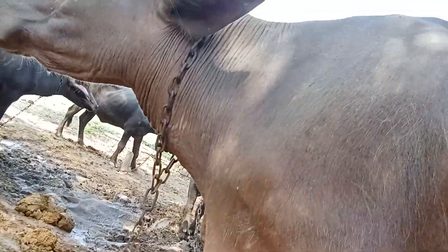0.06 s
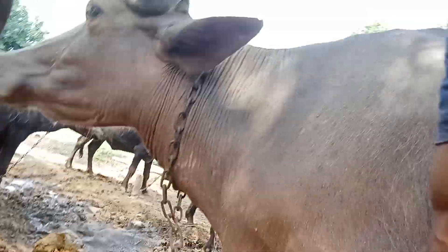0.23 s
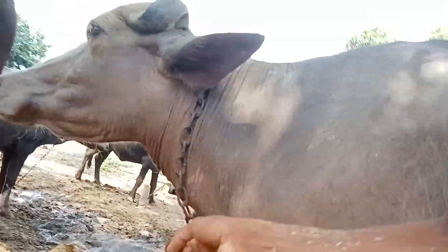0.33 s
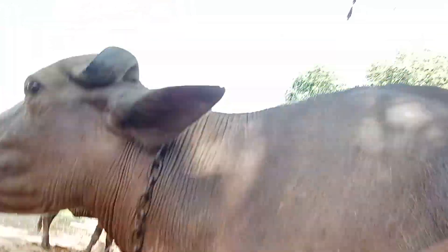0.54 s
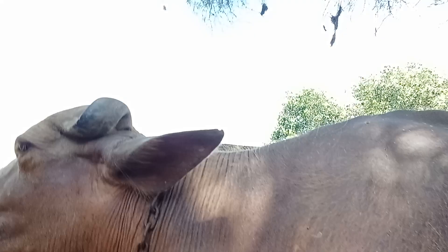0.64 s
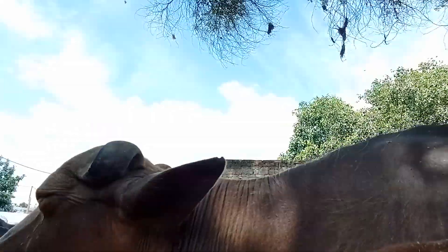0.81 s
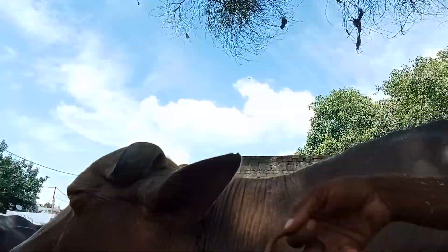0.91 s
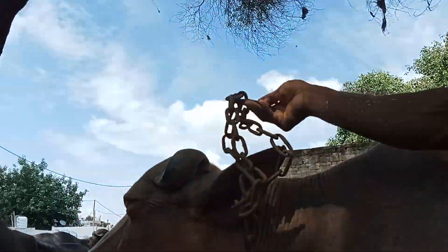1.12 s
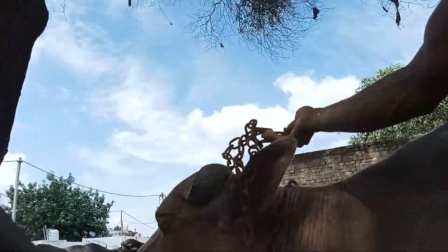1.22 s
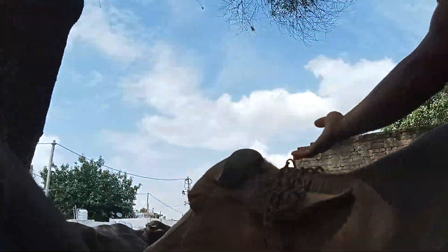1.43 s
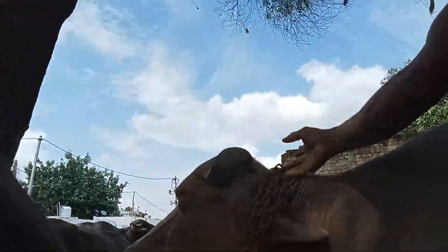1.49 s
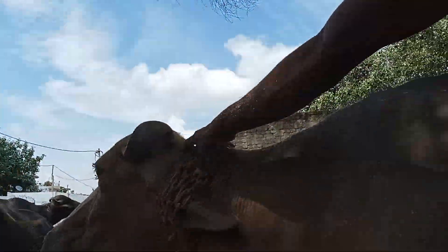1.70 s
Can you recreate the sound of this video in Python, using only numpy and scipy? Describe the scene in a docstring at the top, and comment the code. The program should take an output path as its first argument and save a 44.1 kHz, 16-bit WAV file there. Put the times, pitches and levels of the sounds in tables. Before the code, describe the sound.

A heavy iron chain clinks and rattles close to a small microphone, first with a hard clank and muted links, then brighter jingling as it drops in a bunch; soft hide rubs, faint far engine, open yard.

```python
"""Tether chain lifted off a buffalo

An iron chain comes off the animal's neck, close by in an open yard: ringing modes and gritty noise ticks
make the clinks, dull on the hide, then high and jingling, with bunched contacts for the rattles.
Noise grains make the grinding, noise cracks and low modes the hard knocks.
Shaped noise and short tones rub and bump on the hide; wavering tones over air noise make a far engine.
"""
import sys
import numpy as np
from scipy import signal
from scipy.fft import rfft, irfft
from scipy.io import wavfile

SR = 44100
rng = np.random.default_rng(int(sys.argv[2]) if len(sys.argv) > 2 else 0)


def transcribe(signal):
    """Save signal, clipped to [-1, 1], as a 16-bit WAV file at the path in sys.argv[1]."""
    frames = np.atleast_2d(signal).T
    limited = np.clip(frames, -1, 1)
    pcm = np.round(limited * 32767).astype(np.int16)
    wavfile.write(sys.argv[1], SR, pcm)


N = 77175
T = np.arange(N) / SR
HIT_T = T[:SR * 2 // 5]  # time within one hit, s

# link strikes: start_s, ring_db, tick_db (before TICK_LIFT_DB), ring_length (share of free ring), link (number)
CLINKS = [(0.0005, -43, -32, 2.1, 0), (0.071, -22.5, -33.5, 0.44, 0), (0.112, -23, -45, 0.3, 0),
          (0.123, -26.5, -28.5, 0.7, 0), (0.1621, -25.5, -35, 0.28, 0), (0.1779, -25, -33.5, 0.53, 0),
          (0.203, -12, -32.5, 0.36, 0), (0.232, -13.5, -35.5, 0.23, 2), (0.3871, -16.5, -31, 1.13, 1),
          (0.398, -21, -39, 1, 1), (0.517, -37, -59, 0.95, 2), (0.576, -38, -43, 0.15, 2),
          (0.579, -30.5, -38.5, 1.3, 1), (0.5944, -24, -35.5, 0.37, 2), (0.608, -18.5, -35, 0.53, 1),
          (0.638, -48, -43, 0.5, 2), (0.658, -23.5, -38, 1.05, 2), (0.666, -24, -35.5, 0.7, 2),
          (0.704, -38, -42.5, 0.37, 1), (0.7219, -27.5, -38, 0.69, 2), (0.751, -47, -39.5, 0.64, 2),
          (0.768, -54, -42.5, 0.4, 2), (0.8044, -19, -36.5, 0.63, 1), (0.813, -26, -35.5, 0.54, 2),
          (0.819, -20, -35, 0.75, 1), (0.835, -36, -37, 0.56, 2), (0.8632, -47, -35, 0.46, 2),
          (0.869, -25, -47, 0.27, 1), (0.874, -54, -34, 0.47, 2), (0.968, -17, -34.5, 0.57, 3),
          (0.9898, -23, -38, 0.37, 3), (1.0117, -16.5, -44, 0.67, 4), (1.097, -44, -55, 0.26, 11),
          (1.127, -16, -49.5, 0.97, 5), (1.1637, -35, -50, 0.48, 11), (1.201, -31.5, -44, 0.32, 11),
          (1.2128, -18, -27, 2.2, 6), (1.252, -17, -49, 0.2, 2), (1.258, -16, -29.5, 1.36, 7),
          (1.271, -19, -58, 0.52, 7), (1.2811, -15, -34, 0.24, 2), (1.295, -29.5, -29, 0.99, 3),
          (1.3208, -32.5, -43, 1.1, 7), (1.349, -41, -37.5, 1.2, 3), (1.365, -24, -37, 1.3, 8),
          (1.386, -30, -40, 1.28, 8), (1.396, -20.5, -55, 0.55, 7), (1.4177, -35.5, -34.5, 3.8, 2),
          (1.439, -30, -40, 0.34, 2), (1.4631, -11, -34.5, 0.74, 9), (1.469, -17, -37.5, 0.31, 6),
          (1.506, -40, -43, 0.84, 6), (1.5396, -30.5, -37, 0.62, 10), (1.5734, -34.5, -36, 0.87, 10),
          (1.59, -38, -45.5, 0.27, 10), (1.642, -43, -47.5, 0.54, 10), (1.694, -67, -51, 0.37, 6)]
# modes of each link or bunch, by number: pitch_hz, level_db (relative), t60_s (of the free ring)
LINK_MODES = { 0: [(3080, -11, .13), (3330, -10, .07), (7950, -4, .04), (9100, 0, .035), (10050, -5, .07),
              (12620, -8, .06), (15000, -8, .07)], 1: [(9388, -1, .2), (9453, 0, .16), (9510, -2, .12),
              (10800, -8, .11), (11080, -9, .14), (11255, -7, .17), (11540, -11, .08), (11800, -9, .13)],
              2: [(9540, 3, 0.11), (9880, 0, 0.11), (10000, -16, 0.079), (10920, 2.5, 0.12),
              (11600, 6, .07), (11760, -2, 0.083), (11280, -2, 0.1), (12000, -0.5, 0.18),
              (12600, 3, 0.059)], 3: [(9776, 0, .09), (10130, -4, .07), (10900, -9, .04), (11500, -3, .07),
              (12300, -12, .07)], 4: [(9663, 0, .07), (10950, -13, .17), (11000, -4, .055)],
              5: [(6800, -22, .03), (8590, -19, .04), (11250, 0, .07), (11390, -6, .1)],
              6: [(9442, -16, .12), (12293, -2, .13), (12340, -4, .1), (12957, -5, .12), (13350, -9, .06),
              (14050, -5, .12), (14720, -5, .03)], 7: [(9480, -15, .08), (12957, -11, .13), (13120, 0, .16),
              (13207, -8, .12), (13530, -2, .13), (13750, -12, .06), (14050, -13, .12)],
              8: [(2890, -14, .1), (3150, -13, .17), (3290, -12, .15), (7820, -12, .11), (8700, -9, .08),
              (9700, -9, .05), (12310, -5, .1), (13070, -4, .1), (13560, 0, .14)], 9: [(8420, -21, .07),
              (8790, -20, .08), (12330, -14, .09), (13570, 0, .085), (14920, -12, .06)],
              10: [(2900, -7, .16), (3310, -7, .16), (7860, -10, .11), (8990, 0, .19), (9380, -7, .11),
              (12330, -10, .12), (14850, -7, .2)], 11: [(6750, -1, .06), (8600, 0, .07), (11300, -3, .06)],
              }
# colour of the contact tick and its grind: freq_hz, level_db (per Hz, relative)
TICK_COLOUR = [(500, -11.5), (1500, -10), (2500, -4.5), (4200, 5), (6000, -3.5), (8000, -2.5), (10000, 2),
               (12500, -1.5), (14000, -2), (15500, -1)]
# bunches of links tumbling over one another: start_s, length_s, level_db (before RATTLE_TRIM_DB), centre_hz
RATTLES = [(0.592, 0.026, -27.5, 11600), (0.656, 0.054, -28.5, 11200), (0.804, 0.032, -30.5, 11200),
           (0.861, 0.022, -53, 10800), (1.2114, 0.005, -24, 14200), (1.241, 0.032, -22, 12900),
           (1.341, 0.025, -28, 10300), (1.381, 0.022, -25, 13500), (1.4, 0.055, -36, 10200)]
# course of the links' shifting between strikes: time_s, level_db (before SHIFT_TRIM_DB)
SHIFT_LEVELS = [(0.0, -45.5), (0.326, -55), (1.242, -57.5), (1.378, -48), (1.75, -55.5)]
# colour of the shifting links: freq_hz, level_db (per Hz, relative)
SHIFT_COLOUR = [(500, 9), (1500, 4.5), (2500, 2.5), (4000, 4.5), (6000, -40.5), (8000, -53), (10000, 1),
                (12500, -5.5), (15000, -16)]
# hard knocks: start_s, body_db, crack_db, crack_hz (centre), body (number)
KNOCKS = [(0.2306, -15, -17, 3720, 0), (0.2333, -20, -29, 3500, 0), (0.264, -46, -42, 1480, 0),
          (0.292, -37, -35, 1620, 0), (.3125, -49, -34, 1490, 0), (.453, -49, -45, 960, 0),
          (.869, -54, -36.5, 1690, 1), (1.012, -46, -48, 1370, 1), (1.2928, -24, -33, 4150, 1),
          (1.3007, -21.5, -26.5, 2220, 1), (1.3005, -28, -31, 3970, 1), (1.4173, -56, -36.5, 1064, 1)]
# modes of a hollow clank (0) and of a duller thud (1): pitch_hz, level_db (relative), t60_s
BODY_MODES = { 0: [(346, -10.5, 0.041), (450, -12.5, 0.048), (557, -14, 0.03), (830, -9, 0.029),
              (899, -6, 0.15), (954, -12.5, 0.09), (1253, -2, 0.024), (1580, -2.5, 0.027),
              (2140, -1, 0.023), (2690, -1.5, 0.022), (3470, 2.5, 0.013), (4080, -6, 0.03)],
              1: [(290, -9, .053), (430, -2, .045), (530, -3, .04), (720, -4, .03), (1050, -1, .03),
              (1400, -3, .025), (1780, -6, .025), (2350, -2, .018), (3100, -6, .02)], }
# rubs on the hide: start_s, length_s, level_db (before the swelling)
RUBS = [(-.02, 0.064, -44.5), (0.103, 0.16, -45.5), (0.229, 0.11, -43), (0.44, 0.053, -58.5),
        (0.833, 0.131, -50), (1.227, 0.13, -51), (1.391, 0.064, -62)]
# colour of the rubs: freq_hz, level_db (per Hz, relative)
RUB_COLOUR = [(100, -23), (250, -2.5), (450, 3.5), (650, -3), (800, 1.5), (920, 0), (1100, -10),
              (1600, -5.5), (2200, -14), (4000, -16.5), (8000, -36)]
# soft bumps on the animal: start_s, length_s, pitch_hz, level_db (peak)
BUMPS = [(-.01, 0.027, 104, -33), (.12, 0.026, 122, -38.5), (0.902, 0.032, 228, -37.5),
         (1.262, 0.02, 400, -39.5), (1.526, 0.059, 69.3, -41.5)]
# partials of the engine: multiple (of ENGINE_HZ), level_db
ENGINE_PARTIALS = [(2, -61), (3, -59), (4, -59), (5, -57)]
# faint far tones that come and go: start_s, length_s, pitch_hz, level_db (at the top of the swell)
WHINES = [(0.446, 0.51, 706.5, -59.5), (0.847, 0.24, 842, -58), (1.397, 0.33, 845, -62)]
# colour of the outdoor air: freq_hz, level_db (per Hz, relative)
YARD_COLOUR = [(25, -6), (70, 10.5), (105, 14), (190, 2), (326, 0), (700, -21), (950, -8), (2000, -33),
               (4030, -14), (6900, -30.5), (9570, -14), (12200, -26), (16000, -50)]

# pitch spread from strike to strike (share), wider for the numbers that are bunches of unlike links
DETUNE, BUNCH_DETUNE, BUNCHES = .001, .014, (0, 2)
ATTACK_S, MODE_SPREAD_DB = 0.00014, 3
RING_WANDER_RAD, RING_WANDER_S = 0.51, 0.00646  # a tumbling link's phase: typical step, time per step
TICK_LIFT_DB, TICK_T60_S = 7, 0.018
GRIND_DB, GRIND_T60_S = -10.5, 0.097  # level relative to the tick
# links bounce and slide just after they meet: energy against the first blow, decay at ring length 1
CHATTER_DB, CHATTER_T60_S = 1.5, 0.026
RATTLE_TRIM_DB, RATTLE_T60_S, RATTLE_OCTAVES = -1.8, 0.03354, 0.11
RATTLE_TICK_DB, RATTLE_TICK_T60_S = -6.5, 0.013  # level relative to the ring
SHIFT_TRIM_DB, SHIFTS_PER_S, SHIFT_SPREAD_DB, SHIFT_T60_S = -2.5, 1300, -0.5, 0.056
CRACK_T60_S, CRACK_OCTAVES = 0.031, 0.13
BODY_RISE_S, BODY_SPREAD_DB = 0.00026, 1.5
RUB_SWELL_DB, RUB_SWELL_HZ = 3.04, 121
ENGINE_HZ, ENGINE_WAVER_RAD, WHINE_WAVER_RAD = 41.2, 0.3, 0.8
YARD_DB = -53
ECHO_DB, ECHO_T60_S, ECHO_GAP_S = -20.5, 0.3, .004
LOW_CUT_HZ, EDGE_HZ = 49, 15650


def amp(db):
    """Turns decibels into gain."""
    return 10 ** (np.asarray(db) / 20)


def unit(x):
    """Scales a sound to rms 1."""
    return x / np.sqrt(np.mean(x ** 2) + 1e-20)


def fade(t60):
    """Exponential decay over one hit, down 60 dB after t60 seconds."""
    return np.exp(-np.log(1000) * HIT_T / max(t60, 1e-3))


def add(mix, s, sound):
    """Mixes a sound in at time s, trimming whatever falls outside."""
    start = round(s * SR)
    sound = sound[max(-start, 0):]
    part = mix[max(start, 0):][:len(sound)]
    part += sound[:len(part)]


def colour(x, points):
    """Filters a sound through a smooth spectral curve and sets it to rms 1."""
    hz, db = np.transpose(points)
    f = np.fft.rfftfreq(len(x), 1 / SR)
    gain = amp(np.interp(np.log(f + 1), np.log(hz), db))
    return unit(irfft(rfft(x) * gain, len(x)))


def noise(points, size):
    """Coloured noise of rms 1."""
    return colour(rng.standard_normal(size), points)


def drift(hz):
    """Slow random motion of rms 1: noise with a soft upper limit near hz."""
    lowpass = np.exp(-(np.fft.rfftfreq(N, 1 / SR) / hz) ** 2)
    return unit(irfft(rfft(rng.standard_normal(N)) * lowpass, N))


def ring(modes, length, detune, spread_db):
    """Struck metal: dying modes that wander in phase, each blow weighting them a little differently."""
    hz, db, t60 = np.transpose(modes)
    weight = amp(db + spread_db * rng.standard_normal(len(hz)))
    hz = hz * (1 + detune * rng.standard_normal(len(hz)))
    wander = RING_WANDER_RAD * rng.standard_normal((len(hz), 64)).cumsum(axis=1)
    knots = np.arange(wander.shape[1]) * RING_WANDER_S
    waves = np.zeros(len(HIT_T))
    for f, w, decay, path in zip(hz, weight, t60, wander):
        phase = 2 * np.pi * (f * HIT_T + rng.random()) + np.interp(HIT_T, knots, path)
        waves += w * fade(decay * length) * np.sin(phase)
    attack = 1 - np.exp(-HIT_T / ATTACK_S)
    return waves * attack / np.sqrt(np.sum(weight ** 2) / 2)


def clink(ring_db, tick_db, length, link):
    """Two links meet: a gritty tick, then a ring that the chatter of the contact keeps exciting."""
    size = len(HIT_T)
    chatter = rng.standard_normal(size) ** 3 * fade(CHATTER_T60_S * length)
    force = amp(CHATTER_DB) * chatter / np.linalg.norm(chatter)
    force[0] += 1  # the first blow
    detune = BUNCH_DETUNE if link in BUNCHES else DETUNE
    free = ring(LINK_MODES[link], length, detune, MODE_SPREAD_DB)
    tone = signal.fftconvolve(force, free)[:size]
    tone *= np.linalg.norm(free) / np.linalg.norm(tone)  # chatter leaves the energy unchanged
    tick = noise(TICK_COLOUR, size) * fade(TICK_T60_S)
    # the fifth power makes the noise spiky, hence gritty
    grind = colour(rng.standard_normal(size) ** 5, TICK_COLOUR) * fade(GRIND_T60_S)
    contact = tick + amp(GRIND_DB) * grind
    return amp(ring_db) * tone + amp(tick_db + TICK_LIFT_DB) * contact


def rattle(length, db, centre_hz, count=18):
    """A bunch of links tumbles: many small contacts, each a tick and a short ring at its own pitches."""
    out = np.zeros(len(HIT_T))
    for k in range(count):
        pitches = centre_hz * 2 ** (RATTLE_OCTAVES * rng.standard_normal(size=2))
        modes = [(hz, 0, RATTLE_T60_S) for hz in pitches]
        tick = amp(RATTLE_TICK_DB) * noise(TICK_COLOUR, len(HIT_T)) * fade(RATTLE_TICK_T60_S)
        start = length * (k + rng.random()) / count
        add(out, start, rng.random() * (ring(modes, 1, 0, MODE_SPREAD_DB) + tick))
    return amp(db + RATTLE_TRIM_DB) * out


def shifting():
    """Rusty links slip over one another: random impulses, each setting off a short grain of noise."""
    slips = rng.standard_normal(N) * (rng.random(N) < SHIFTS_PER_S / SR)
    slips *= amp(SHIFT_SPREAD_DB * np.minimum(rng.exponential(1, N), 3))
    grain = rng.standard_normal(len(HIT_T)) * fade(SHIFT_T60_S)
    grains = signal.fftconvolve(slips, grain)[:N]
    level_db = SHIFT_TRIM_DB + np.interp(T, *np.transpose(SHIFT_LEVELS))
    return colour(grains, SHIFT_COLOUR) * amp(level_db)


def knock(body_db, crack_db, crack_hz, body):
    """The chain hits something hard: a short band of noise cracks and a body's low modes ring."""
    band = [(crack_hz * 2 ** (k * CRACK_OCTAVES), -3 * k * k) for k in range(-5, 5)]
    crack = noise(band, len(HIT_T)) * fade(CRACK_T60_S)
    rise = 1 - np.exp(-HIT_T / BODY_RISE_S)
    tone = ring(BODY_MODES[body], 1, 0, BODY_SPREAD_DB) * rise
    return amp(body_db) * tone + amp(crack_db) * crack


def hide():
    """Hand and chain on the animal: unevenly swelling noise rubs and soft, low half-sine bumps."""
    out = np.zeros(N)
    for s, length, db in RUBS:
        size = round(length * SR)
        add(out, s, amp(db) * noise(RUB_COLOUR, size) * signal.windows.tukey(size, .5))
    out *= amp(RUB_SWELL_DB * drift(RUB_SWELL_HZ))
    for s, length, hz, db in BUMPS:
        t = T[:round(length * SR)]
        add(out, s, amp(db) * np.sin(np.pi * t / length) * np.sin(2 * np.pi * hz * t))
    return out


def wavering(hz, waver_rad):
    """A tone of rms 1 whose phase strays slowly, by waver_rad rms."""
    phase = 2 * np.pi * (hz * T + rng.random()) + waver_rad * drift(hz=17.7)
    return np.sqrt(2) * np.sin(phase)


def engine():
    """A far engine: harmonics that waver in level and phase, and faint whines that swell and sink."""
    out = np.zeros(N)
    for multiple, db in ENGINE_PARTIALS:
        level = amp(db) * (1 + 0.2 * drift(hz=11.6))
        out += level * wavering(multiple * ENGINE_HZ, ENGINE_WAVER_RAD)
    for s, length, hz, db in WHINES:
        swell = np.sin(np.pi * np.clip((T - s) / length, 0, 1))
        out += amp(db) * swell * wavering(hz, WHINE_WAVER_RAD)
    return out


def yard():
    """The outdoor air: steady coloured noise."""
    return amp(YARD_DB) * noise(YARD_COLOUR, N)


def scatter(sound):
    """Ground and walls scatter the sound faintly: convolution with a dying noise tail."""
    tail = rng.standard_normal(len(HIT_T)) * fade(ECHO_T60_S) * (HIT_T > ECHO_GAP_S)
    return amp(ECHO_DB) * signal.fftconvolve(sound, tail / np.linalg.norm(tail))[:N]


def scene():
    """Lays the chain and its scatter over the hide, the engine and the yard."""
    chain = shifting()
    for s, *strike in CLINKS:
        add(chain, s, clink(*strike))
    for s, *bunch in RATTLES:
        add(chain, s, rattle(*bunch))
    for s, *blow in KNOCKS:
        add(chain, s, knock(*blow))
    return (chain + scatter(chain) + hide() + engine() + yard())[None]


def record(dry):
    """The small microphone loses the deep bass; a steep filter then limits the treble."""
    low_cut = signal.butter(3, LOW_CUT_HZ, "highpass", fs=SR, output="sos")
    thin = signal.sosfilt(low_cut, dry)
    band_limit = signal.firwin(255, EDGE_HZ, window=("kaiser", 8), fs=SR)
    return signal.oaconvolve(thin, band_limit[None], "same")


dry = scene()
out = record(dry)
transcribe(out)
```